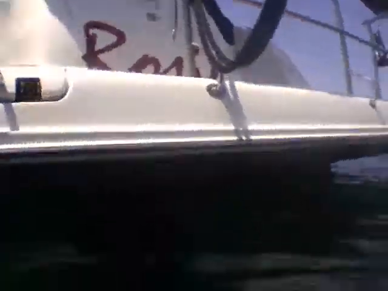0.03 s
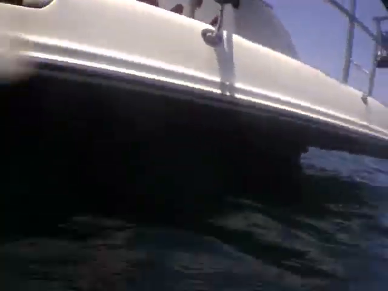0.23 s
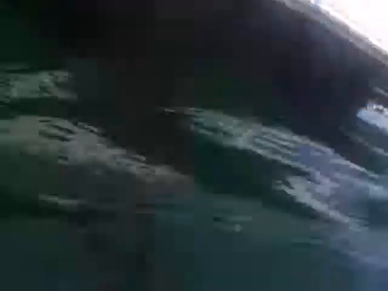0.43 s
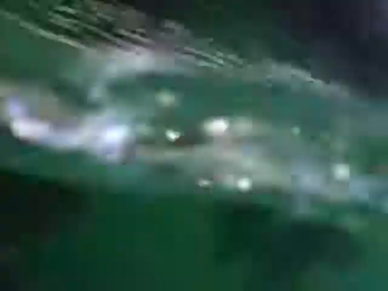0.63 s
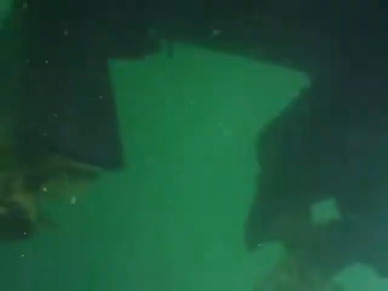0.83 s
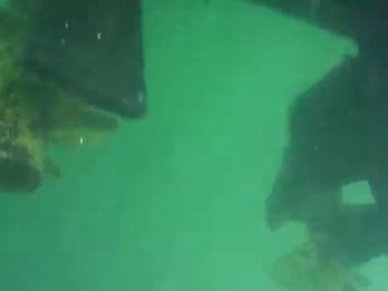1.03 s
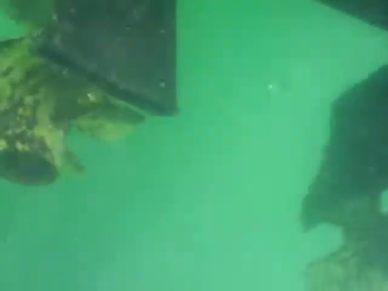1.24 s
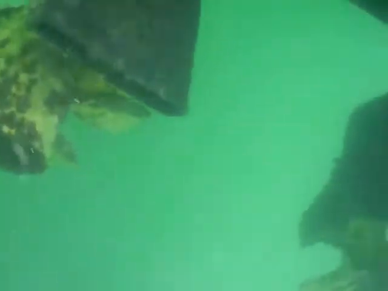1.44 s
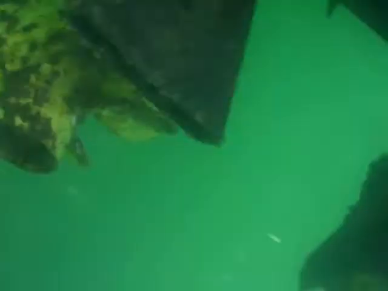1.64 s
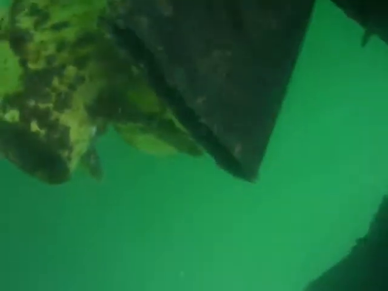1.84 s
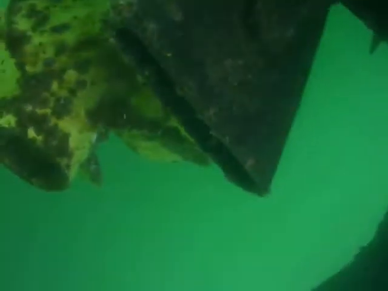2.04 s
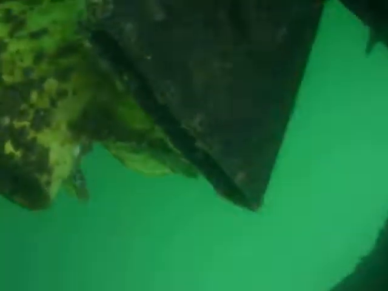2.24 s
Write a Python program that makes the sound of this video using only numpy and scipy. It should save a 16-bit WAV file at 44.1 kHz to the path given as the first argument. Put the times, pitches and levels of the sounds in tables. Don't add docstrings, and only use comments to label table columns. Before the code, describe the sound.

A small camera plunges into water beside a boat: faint hiss, ticks, rubbing and thumps first, then a loud burst of ringing bubbles and fizzing foam, then quiet, muffled low gurgles heard from inside the submerged housing.

```python
import sys
import numpy as np
from scipy import signal
from scipy.fft import rfft, irfft, next_fast_len
from scipy.io import wavfile
from scipy.ndimage import map_coordinates

SR = 44100
rng = np.random.default_rng(int(sys.argv[2]) if len(sys.argv) > 2 else 0)


def gain_from_db(level_db):
    decades = np.asarray(level_db, float) / 20
    return 10 ** decades


def store_wav(level_fs):
    pcm = np.round(np.clip(np.atleast_2d(level_fs), -1, 1) * 32767)
    wavfile.write(sys.argv[1], SR, pcm.T.astype(np.int16))


N = 101429

# frequency in Hz, level in dB per Hz.
HISS_COLOUR = [(350, -37.5), (600, -6), (1580, -11), (2200, -13.5), (5650, -16.5), (15400, -17),
               (15800, -22)]
# pitch in Hz, level in dB.
WHINE_LINES = [(7550, -84.5), (11300, -87.5)]
TICKING_PICTURES = [*range(18), 32, 35, 38, 41, 42, 43, 44, 45, 48, 49, 50, 57, 60, 63]
# start in seconds, length in seconds, level in dB.
RUB_STROKES = [(-.02, 0.13, -49), (.16, .11, -52.5), (.25, 0.065, -48.5), (.29, .11, -57),
               (.335, 0.011, -57), (.401, 0.0054, -49), (.468, 0.012, -54.5), (.51, 0.12, -64.5),
               (1.261, 0.0063, -41), (1.326, 0.01, -56.5), (.278, 0.013, -49), (1.643, 0.0089, -61),
               (1.676, 0.0047, -57.5)]
# frequency in Hz, level in dB per Hz.
RUB_COLOUR = [(240, -67), (400, -20.5), (658, -6), (1420, -0.5), (4340, -11), (10000, -35.5), (13000, -57),
              (22000, -120)]
# time in seconds, level in dB.
SLOSH_LEVEL = [(0, -58), (.12, -63), (.3, -48), (.4, -60), (.55, -60), (.65, -50.5), (.9, -51), (1.1, -49),
               (1.2, -52.5), (1.32, -53), (1.45, -57.5), (1.58, -55), (1.67, -46.5), (1.84, -57.5),
               (1.95, -47.5), (2.13, -54), (2.3, -47)]
# frequency in Hz, level in dB per Hz.
SLOSH_COLOUR = [(32, -35), (55, 1.5), (133, -1.5), (225, -7.5), (400, -19), (680, -22), (1000, -46.5),
                (1300, -73), (2200, -120)]
# frequency in Hz, level in dB per Hz.
HEAVE_COLOUR = [(12, 0), (32, -4), (70, -19.5)]
# time in seconds, level in dB.
WHIR_LEVEL = [
    (1.7, -92.5),
    (1.86, -71),
    (2.3, -70),
]
# time in seconds, depth in dB, build-up in seconds,
# ring in Hz (negative pushes outward), 60 dB decay in seconds.
HOUSING_PUSHES = [
    (.215, -31, 0.0091, 9, 0.042),
    (.295, -20.5, 0.0055, 51, 0.15),
    (.4215, -20.5, 0.011, 17, 0.0093),
    (.435, -27, 0.0057, -2.5, 0.41),
    (.4875, -16.5, 0.0012, 6, 0.036),
    (.482, -30, 0.0029, -37, 0.0043),
    (.644, -21, 0.00039, -250, 0.0098),
    (.70, -25, 0.013, -29.5, 0.25),
    (.945, -33, 0.011, 49, 0.13),
    (1.455, -37.5, 0.017, 25, 0.14),
]
# time in seconds, peak in dB, pitch in Hz, life in cycles.
BIG_BUBBLES = [(.6435, -20.5, 1230, 11), (0.7014, -22, 702, 28.5), (.743, -24, 880, 14),
               (.772, -20, 963, 29), (.7723, -4.5, 1686, 18), (.812, -31.5, 910, 13),
               (.817, -22.5, 937, 20), (0.8679, -23.5, 1324, 12), (0.8765, -12.5, 746, 18),
               (0.9116, -25.5, 1200, 18), (0.9387, -11.5, 1105, 5.9), (1.0078, -17, 808, 21.6),
               (1.021, -32, 827, 25), (1.0539, -20.5, 694, 8.2), (1.12, -45, 965, 23),
               (1.254, -33.5, 650, 6), (1.328, -43.5, 1030, 10),
               (.318, -40, 1270, 13), (.373, -48, 1300, 16), (.423, -41, 373, 1.7),
                     (.4885, -48.5, 447, 12), (.625, -63, 855, 7.6), (.657, -41, 1310, 10),
                     (.666, -29, 1110, 4.5), (.688, -30.5, 1300, 8), (.7155, -27, 1300, 6.5),
                     (.756, -29.5, 930, 21), (.78, -27, 900, 7.3), (.794, -28, 1250, 9.1),
                     (.805, -39.5, 1000, 17), (.839, -29, 970, 12), (.888, -32, 790, 9.7),
                     (.936, -29, 900, 3.8), (.943, -33.5, 864, 14), (1.097, -46, 880, 17),
                     (1.14, -44.5, 585, 4.7), (1.2625, -41.5, 1180, 3.9), (.8115, -45, 9000, 640)]
# time in seconds, peak in dB, pitch in Hz.
MIDDLE_BUBBLES = [(.472, -49.5, 1800), (.49, -45, 1710), (.648, -30, 2150), (.693, -28.5, 1930),
                  (.728, -36.5, 2120), (.743, -32, 1628), (.782, -21, 2028), (.805, -33.5, 1920),
                  (.85, -32, 2000), (.878, -23, 1730), (.893, -37, 2140), (.9, -32, 2060),
                  (.945, -32, 1710), (1.022, -38, 1930), (0.7874, -27.5, 1968), (0.8131, -29.5, 1850),
                  (1.0081, -29, 1920)]
# time in seconds, peak in dB, pitch in Hz.
LASTING_BUBBLES = [
    (0.7347, -28, 1970),
    (0.8874, -32, 1830),
    (0.9867, -38, 1850),
    (1.0334, -35, 2100),
    (1.055, -30, 1720),
    (1.0979, -31.5, 1764),
    (1.1872, -47.5, 1820),
]
# time in seconds, peak in dB, pitch in Hz.
SMALL_BUBBLES = [(0.631, -32, 4190), (.651, -27.5, 3450), (.651, -28, 4030), (.668, -34.5, 4250),
                 (.689, -33.5, 3000), (.729, -38, 4170), (.7652, -17, 2022), (.7885, -27.5, 3564),
                 (.853, -28.5, 3320), (.894, -30.5, 2880), (1.2615, -43, 2790), (0.6662, -20, 3060),
                 (0.673, -36, 3100), (0.7147, -22, 3850), (0.7667, -27, 3250), (0.7798, -19.5, 2873),
                 (0.795, -26, 3095), (0.8492, -31, 3250), (0.8794, -18, 4520), (0.9075, -35.5, 2800),
                 (0.936, -37, 2900), (0.9717, -23, 3900), (1.0093, -33.5, 4300), (1.2688, -37.5, 3980)]
# time in seconds, peak in dB, pitch in Hz.
TINY_BUBBLES = [(.6168, -55, 7200), (.6432, -46, 6930), (.649, -52.5, 11400), (.6554, -36, 6010),
                (.656, -77, 12180), (.6627, -43.5, 12310), (.6702, -46, 9220), (.687, -52, 10100),
                (.7131, -53, 7310), (.7789, -51, 7360), (.808, -43, 12360), (.8115, -42, 8900),
                (.817, -40, 8600), (.82, -43.5, 12390), (.831, -49, 14470), (.833, -43.5, 11750),
                (.835, -48, 7750), (.84, -45.5, 7690), (.841, -43.5, 12000), (.8435, -43.5, 13200),
                (.844, -49, 8950), (.86, -40.5, 12780), (.862, -42.5, 6940), (.873, -49.5, 9200),
                (.879, -45.5, 9800), (1.2613, -35, 7620)]
# time in seconds, level in dB.
FOAM_LEVEL = [
    (.612, -73),
    (.635, -42),
    (.72, -61),
    (.77, -45),
    (.9, -43.5),
    (.925, -59.5),
    (.99, -42.5),
    (1.07, -63),
    (1.2, -73.5),
]
# frequency in Hz, level in dB per Hz.
FOAM_COLOUR = [(150, -47), (250, -2), (724, 1), (1890, -2), (2460, -11), (4300, -10.5), (5500, -32),
               (7800, -68), (13200, -120)]
# frequency in Hz, level in dB per Hz.
SPRAY_COLOUR = [(4000, -8), (9000, 0), (13000, -1), (15600, -16)]
# time in seconds, peak in dB, ring in Hz.
AIR_GURGLES = [(1.2537, -36, 346), (1.265, -40.5, 460), (1.996, -42, 196), (2.054, -35.5, 193),
               (1.402, -36, 150), (1.513, -45.5, 220), (1.552, -39.5, 149), (1.622, -35.5, 160),
               (1.652, -45.5, 222), (1.703, -43.5, 200), (1.787, -45.5, 277), (1.759, -35, 154),
               (1.884, -41.5, 249), (1.939, -48.5, 223), (1.961, -36, 173.5), (1.97, -32.5, 204),
               (2.022, -32.5, 262), (2.042, -32.5, 193), (2.106, -34.5, 199.5), (2.158, -31.5, 138),
               (2.218, -44, 277), (2.234, -38, 180), (2.299, -27.5, 180)]
TREBLE_HOLES = [.2, .826, .894, .993, 1.033, 1.5, 1.85, 2.01, 2.103]

HISS_DB = -69
TICK_FIRST_S, TICK_EVERY_S = 0.0187, 0.03458
TICK_DB, TICK_HZ, TICK_FALL, TICK_S = -60, 7220, 0.356, 0.0043
LUMP_DB, HEAVE_DB = 4.5, -48.5
PORT_HZ, PORT_WIDTH_HZ = 1880, 480
MEMBRANE_HZ = 900
RISE, START_CYCLES = 0.024, 0.86
PINCH_DB, PINCH_S, PINCH_HZ = -23, 0.013, 4000
MIDDLE_CYCLES, LASTING_CYCLES, SMALL_CYCLES, TINY_CYCLES = 28, 40, 24, 43
SMALL_START, TINY_START = 1.46, 3.1
CLOUD_DB, CLOUD_S = -10, 0.03755
GRAINS_PER_S, GRAIN_HZ, GRAIN_SPREAD = 800, 1700, 0.6
GRAIN_CYCLES, GRAIN_DB, GRAIN_SCATTER_DB = 18, 6, 14
SPRAY_DB, SPRAY_S, SPRAY_START_S = -2, 0.009, 0.0006
GURGLE_BUILD, GURGLE_CYCLES = 0.588, 7.2
HOLE_S, HOLE_HZ = 0.012, 4700


def unit(x):
    return x / np.sqrt(np.mean(x ** 2) + 1e-20)


def curve(rows):
    s, db = np.transpose(rows)
    return np.interp(np.arange(N) / SR, s, db, left=-120, right=-120)


def wobble(rate):
    knots = rng.standard_normal(int(N * rate / SR) + 4)
    return map_coordinates(knots, [np.arange(N) * rate / SR])


def rush(colour):
    f, db = np.transpose(colour)
    size = next_fast_len(N + 8192)
    hz = np.fft.rfftfreq(size, 1 / SR)
    gain = gain_from_db(np.interp(np.log(hz + 1), np.log(f + 1), db, left=-120, right=-120))
    return unit(irfft(rfft(rng.standard_normal(size)) * gain, size)[:N])


def place(s, shapes, lead=0):
    first = np.round(np.asarray(s) * SR).astype(int)[:, None] - lead
    at = first + np.arange(shapes.shape[1])
    return np.bincount(np.clip(at, 0, N).ravel(), shapes.ravel(), N + 1)[:N]


def camera():
    s = TICK_FIRST_S + TICK_EVERY_S * np.array(TICKING_PICTURES)
    whine = sum(gain_from_db(db) * rush([(hz - 90, -12), (hz, 0), (hz + 90, -12)]) for hz, db in WHINE_LINES)
    t = np.arange(400) / SR
    u = np.clip(t / TICK_S, 0, 1)
    tick = np.sin(np.pi * u) ** 2 * np.sin(2 * np.pi * TICK_HZ * t * (1 - TICK_FALL * u / 2))
    ticks = place(s, gain_from_db(TICK_DB) * np.tile(tick, (len(s), 1)))
    return gain_from_db(HISS_DB) * rush(HISS_COLOUR) + whine + ticks


def strokes(rows):
    t = np.arange(N) / SR
    gain = 0
    for s, length, db in rows:
        u = np.clip((t - s) / length, 0, 1)
        gain = gain + gain_from_db(db) * np.abs(np.sin(np.pi * u)) ** 1.16
    return gain


def water():
    slosh = gain_from_db(curve(SLOSH_LEVEL) + LUMP_DB * wobble(25)) * rush(SLOSH_COLOUR)
    grip = gain_from_db(1.2 * wobble(65.6) + 1.98 * wobble(400))
    rub = strokes(RUB_STROKES) * grip * rush(RUB_COLOUR)
    heave = gain_from_db(HEAVE_DB) * rush(HEAVE_COLOUR)
    port = [(PORT_HZ - PORT_WIDTH_HZ, -12), (PORT_HZ, 0), (PORT_HZ + PORT_WIDTH_HZ, -12)]
    whir = gain_from_db(curve(WHIR_LEVEL) + 0.5 * wobble(25)) * rush(port)
    return slosh + heave + rub + whir


def knocks():
    s, db, build, hz, t60 = [c[:, None] for c in np.transpose(HOUSING_PUSHES)]
    t = np.arange(-2000, 9000) / SR
    after = np.maximum(t, 0)
    press = np.exp(-(-np.minimum(t, 0) / build) ** 1.7)
    shape = press * np.cos(2 * np.pi * hz * after) * gain_from_db(-60 * after / t60)
    pushes = place(s[:, 0], -np.sign(hz) * gain_from_db(db) * shape, lead=2000)
    return signal.lfilter(*signal.butter(2, MEMBRANE_HZ, fs=SR), pushes)


def bubbles(rows, cycles, start, size, pinch_db):
    s, db, hz = [c[:, None] for c in np.transpose(rows)[:3]]
    t = np.arange(size) / SR
    life = t * hz / np.reshape(cycles, (-1, 1))
    ring = np.sin(2 * np.pi * hz * t * (1 - RISE / 4 + RISE * life))
    ring = ring * gain_from_db(-60 * life) * (1 - np.exp(-(t * hz / start) ** 2))
    ring = ring / np.abs(ring).max(axis=1, keepdims=True) * np.hanning(2 * size)[size:]
    dull = signal.lfilter(*signal.butter(4, PINCH_HZ, fs=SR), rng.standard_normal(ring.shape))
    crack = gain_from_db(pinch_db - 60 * t / PINCH_S) * unit(dull)
    return place(s[:, 0], gain_from_db(db) * (ring + crack))


def cloud(x):
    tail = rng.standard_normal(3000) * gain_from_db(-60 * np.arange(3000) / SR / CLOUD_S)
    return x + gain_from_db(CLOUD_DB) * signal.fftconvolve(x, tail / np.linalg.norm(tail))[:N]


def plunge_bubbles():
    big = BIG_BUBBLES
    classes = [(big, np.transpose(big)[3], START_CYCLES),
               (MIDDLE_BUBBLES, MIDDLE_CYCLES, START_CYCLES),
               (LASTING_BUBBLES, LASTING_CYCLES, 1.4),
               (SMALL_BUBBLES, SMALL_CYCLES, SMALL_START),
               (TINY_BUBBLES, TINY_CYCLES, TINY_START)]
    return cloud(sum(bubbles(rows, cycles, start, size=3000, pinch_db=PINCH_DB)
                     for rows, cycles, start in classes))


def droplets():
    s, db, _ = np.transpose(TINY_BUBBLES)
    t = np.arange(500) / SR
    return place(s, gain_from_db(db[:, None] + SPRAY_DB - 60 * t / SPRAY_S) * (1 - np.exp(-t / SPRAY_START_S)))


def fizz():
    draw = rng.random((500, 3))
    s = FOAM_LEVEL[0][0] + np.cumsum(-np.log(draw[:, 0])) / GRAINS_PER_S
    bell = np.log(draw[:, 1] / (1 - draw[:, 1])) / 1.727
    hz = np.clip(GRAIN_HZ * np.exp(GRAIN_SPREAD * bell), 500, 4300)
    rows = np.transpose([s, GRAIN_DB - GRAIN_SCATTER_DB * draw[:, 2], hz])
    grains = bubbles(rows, GRAIN_CYCLES, 0.85, size=800, pinch_db=-29)
    spray = droplets() * rush(SPRAY_COLOUR)
    wash = gain_from_db(-2 + 3 * wobble(90)) * rush(FOAM_COLOUR)
    return gain_from_db(curve(FOAM_LEVEL)) * (grains + wash) + spray


def gurgles():
    s, db, hz = [c[:, None] for c in np.transpose(AIR_GURGLES)]
    turns = np.arange(-600, 3000) / SR * hz
    build = np.exp(-(np.minimum(turns, 0) / GURGLE_BUILD) ** 2)
    swell = build * gain_from_db(-60 * np.maximum(turns, 0) / GURGLE_CYCLES)
    swing = np.cos(2 * np.pi * turns) + 0.25 * swell * np.cos(4 * np.pi * turns)
    return place(s[:, 0] + 0.5 / hz[:, 0], gain_from_db(db) * swell * swing, lead=600)


def treble_holes(x):
    high = signal.butter(8, HOLE_HZ, "high", fs=SR, output="sos")
    treble = signal.sosfiltfilt(high, x)
    away = np.abs(np.arange(N) / SR - np.array(TREBLE_HOLES)[:, None]).min(axis=0) / HOLE_S
    return x - treble * np.clip(2 - 2 * away, 0, 0.85)


def scene():
    return (plunge_bubbles() + fizz() + knocks() + gurgles() + water() + camera())[None]


def top_cut(x):
    return signal.sosfilt(signal.butter(12, 15920, fs=SR, output="sos"), x)


def record(dry):
    mix = treble_holes(dry) - 0.0091
    return top_cut(mix)


dry = scene()
out = record(dry)
store_wav(out)
```